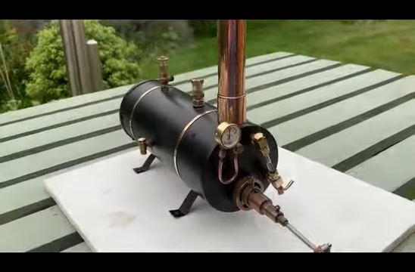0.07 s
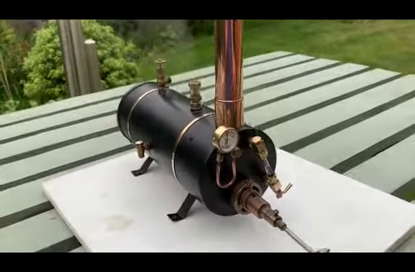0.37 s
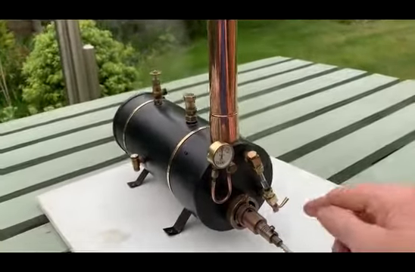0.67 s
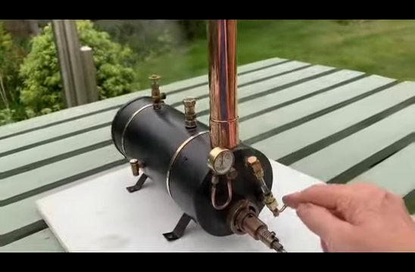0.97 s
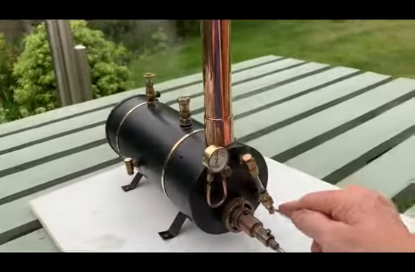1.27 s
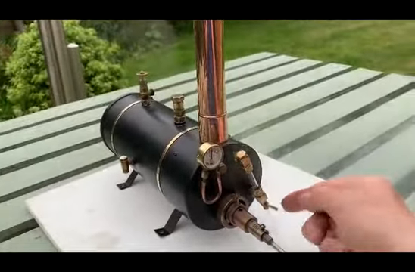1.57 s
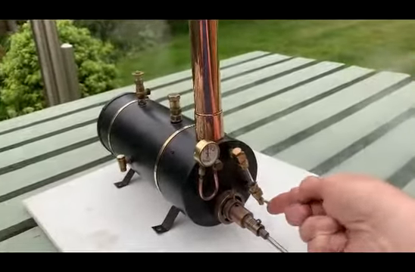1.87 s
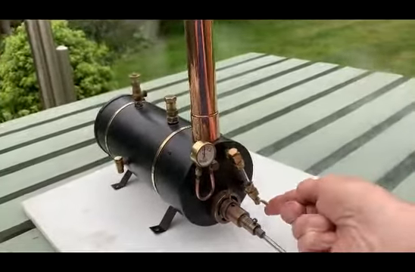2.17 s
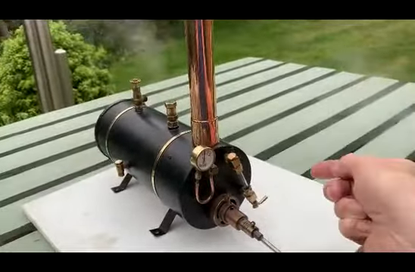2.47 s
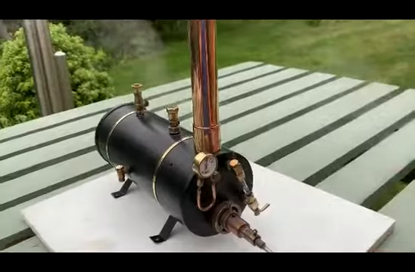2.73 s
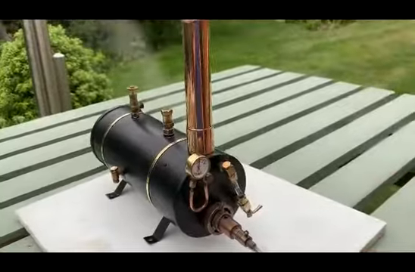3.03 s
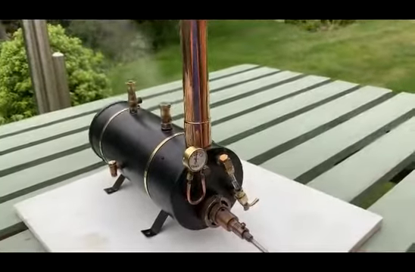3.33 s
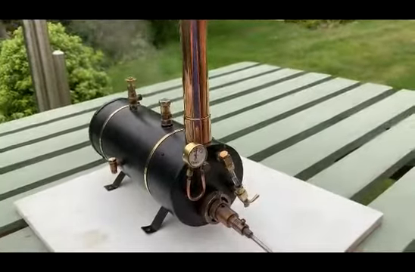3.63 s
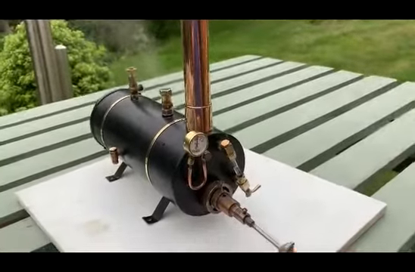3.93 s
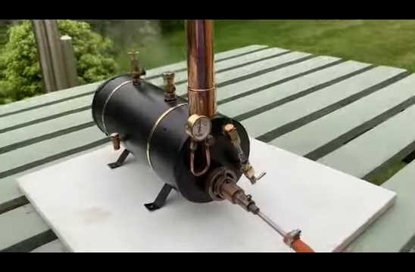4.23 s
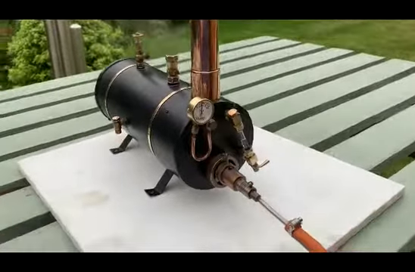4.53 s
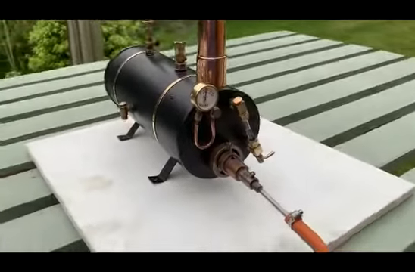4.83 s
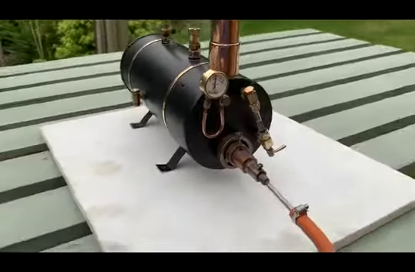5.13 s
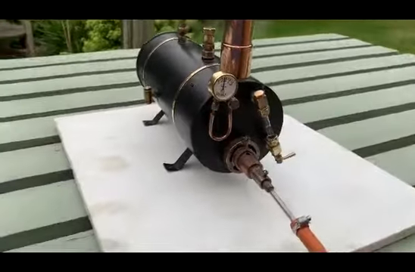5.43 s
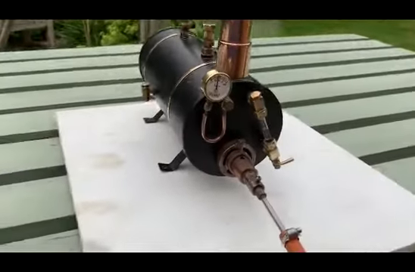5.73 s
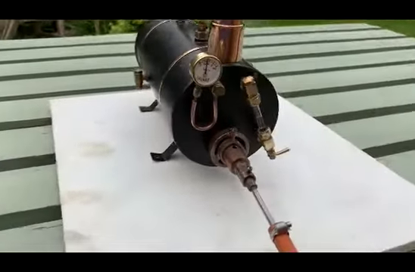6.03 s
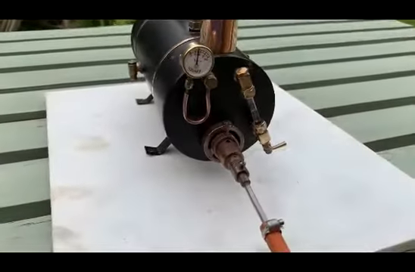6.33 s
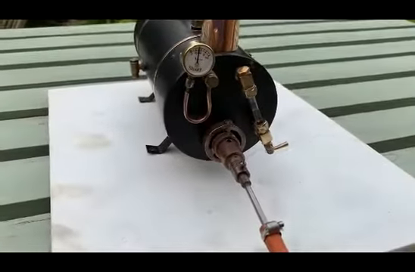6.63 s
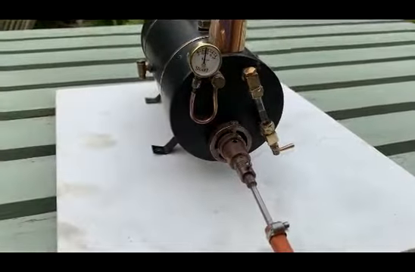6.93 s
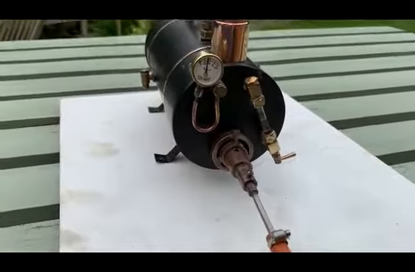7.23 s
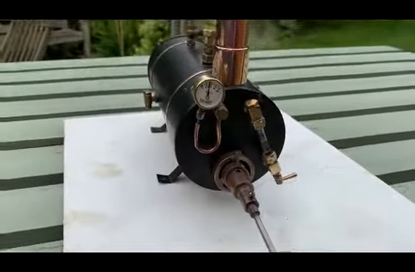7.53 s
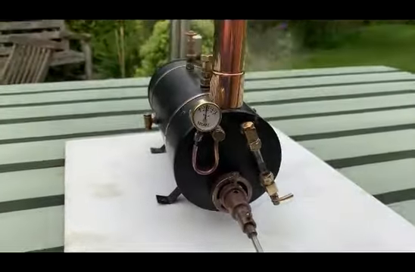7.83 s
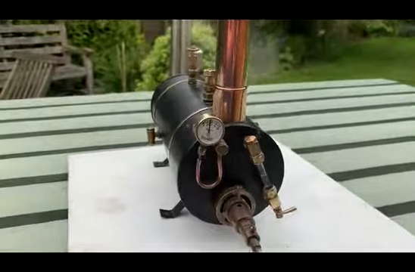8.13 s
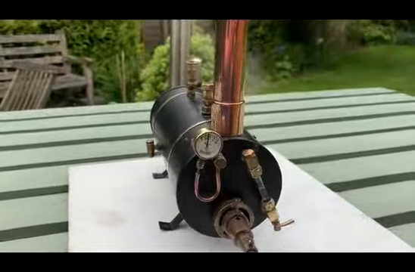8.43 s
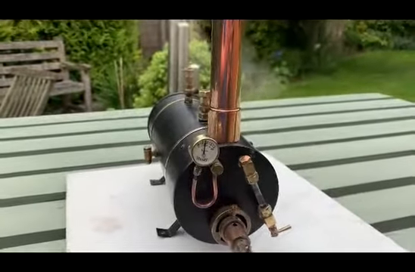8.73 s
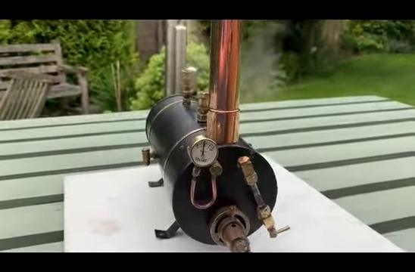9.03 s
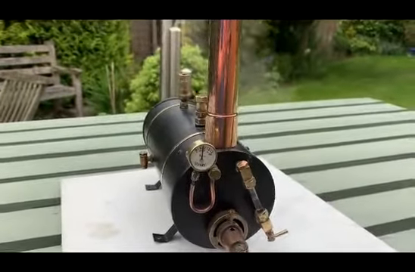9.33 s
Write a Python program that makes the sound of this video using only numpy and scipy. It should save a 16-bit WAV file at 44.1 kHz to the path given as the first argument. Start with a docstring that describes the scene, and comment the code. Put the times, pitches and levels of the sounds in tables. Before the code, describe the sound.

Steam spurts loudly from a little boiler's drain valve, then its gas burner carries on hissing, rumbling and softly popping.

```python
"""A small gas-fired boiler on a garden table, heard from a hand-held microphone moving closer.
The flame rumbles, pops and rings the fire tube; the flue's lowest note pulses its roar.
The gas jet hisses throughout. A drain cock opens for a second: it spits water and blows steam,
and the gain control ducks everything."""
import sys
import numpy as np
from scipy import signal
from scipy.fft import rfft, irfft
from scipy.io import wavfile
from scipy.ndimage import uniform_filter1d, minimum_filter1d, map_coordinates

SR = 44100
rng = np.random.default_rng(int(sys.argv[2]) if len(sys.argv) > 2 else 0)


def file_out(sig):
    """Save sig as 16-bit WAV at sys.argv[1]."""
    # one column per channel
    cols = np.atleast_2d(sig).T
    # limit, then scale
    lim = np.clip(cols, -1, 1)
    pcm = np.round(lim * 32767).astype(np.int16)
    wavfile.write(sys.argv[1], SR, pcm)


N = 418950
TIME_S, FREQ_HZ = np.arange(N) / SR, np.fft.rfftfreq(N, 1 / SR)
FIRE_TUBE_HZ, RING_SIDE_DB, RING_FACING_DB = 1088, -50, 8

# loud flame pops: start_s, relative_peak_db
LOUD_POPS = [(0.405, -28), (0.548, -25.5), (4.234, -26), (4.742, -23), (5.485, -21), (5.555, -23),
             (5.656, -21), (6.086, -24), (6.188, -18.5), (6.556, -21), (6.786, -23), (6.804, -17),
             (6.844, -25), (6.922, -27), (7.174, -18), (7.217, -18.5), (7.235, -20.5), (7.398, -31),
             (7.884, -26), (8.492, -20.5), (8.68, -17), (8.827, -22.5), (8.897, -23.5), (8.95, -22),
             (9.005, -16), (9.058, -21.5), (9.433, -24)]
# flame roar: freq_hz, level_db
ROAR_SPECTRUM = [(330, -28), (450, -27), (540, -7.5), (700, -5.5), (900, -4), (1050, -0.5), (1190, -8.5),
                 (1260, -24.5), (1450, -25.5), (2200, -26), (3500, -85)]
# phase between left and right channels, sound from the drain: freq_hz, left_lead_rad
DRAIN_PHASE = [(100, 0), (2300, .4), (3200, 1.7), (5000, 1.2), (6100, 0), (7000, -1), (8600, -3.14),
               (10500, -6.28), (11100, -6.28), (13450, -9.42), (15300, -12.56)]


def gain_of(db):
    """Decibels to amplitude."""
    return 10 ** (np.asarray(db) / 20)


def unit_rms(x):
    """Scales to rms 1."""
    return x / np.sqrt(np.mean(x ** 2) + 1e-20)


def over_freq(rows):
    """Table interpolated on a log frequency axis."""
    hz, value = np.transpose(rows)
    return np.interp(np.log(FREQ_HZ + 1), np.log(hz + 1), value)


def over_time(rows):
    """Table columns interpolated at every sample."""
    time_s, *columns = np.transpose(rows)
    return [np.interp(TIME_S, time_s, column) for column in columns]


def ramp(start_s, length_s):
    """Linear rise from 0 to 1."""
    return np.clip((TIME_S - start_s) / length_s, 0, 1)


def swell(centre_s, sigma_s):
    """Gaussian envelope, peak 1."""
    return np.exp(-.5 * ((TIME_S - centre_s) / sigma_s) ** 2)


def puff(age_s, decay_s=.004):
    """Pop envelope: quick rise, exponential decay."""
    age = np.maximum(age_s, 0) / decay_s
    return np.sqrt(age) * np.exp(-age)


def resonance(hz, width_hz):
    """One-pole response, gain 1 at centre."""
    return 1 / (1 + 2j * (FREQ_HZ - hz) / width_hz)


def shaped(x, response):
    """Filters by a frequency response; rms 1."""
    return unit_rms(irfft(rfft(x) * response, N))


def wander(rate_hz):
    """Random drift up to about rate_hz; rms 1."""
    return shaped(rng.standard_normal(N), FREQ_HZ / (FREQ_HZ + 2) / (1 + (FREQ_HZ / rate_hz) ** 4))


def turbulence(phase=None):
    """Stereo white noise, by default from the burner's direction."""
    # phase between left and right channels: freq_hz, left_lead_rad
    burner_phase = [(100, 0), (850, .15), (1100, .42), (1800, .5), (2200, .9), (2700, 2.6), (3300, 2.7),
                    (4400, 3.7), (5600, 3.6), (6300, 4.7), (7300, 4.3), (8600, 3.14), (10500, 0),
                    (11100, 0), (13450, -3.14), (15300, -6.28)]
    # stereo width of the noise: freq_hz, left_right_coherence
    stereo_coherence = [(25, .94), (120, .996), (1150, .985), (2000, .65), (3200, .8), (3800, .55),
                        (4300, .75), (4800, .55), (5500, .78), (6100, .35), (6700, .68), (7600, .7),
                        (8350, .998), (8850, .998), (9400, .62), (10000, .6), (10550, .98), (11100, .98),
                        (12400, .8), (13200, .99), (13700, .99), (14550, .42), (15400, .97)]
    # stereo balance: freq_hz, left_minus_right_db
    stereo_balance = [(100, -.7), (1200, -.8), (3400, -.3), (4400, -5), (4900, -8.5), (5400, -4), (7000, 0),
                      (16000, 0)]
    common, separate = rfft(rng.standard_normal((2, N)))
    coherence = np.clip(over_freq(stereo_coherence), 0, 1)
    lead_rad = over_freq(burner_phase if phase is None else phase)
    lean = gain_of(over_freq(stereo_balance) / 2) * np.exp(.5j * lead_rad)
    right = coherence * common + np.sqrt(1 - coherence ** 2) * separate
    return irfft(np.array([common * lean, right / lean]), N)


def burner_gain(side_db, facing_db):
    """Gain of a burner part as the microphone circles; facing the jet adds facing_db."""
    # microphone path: time_s, nearness_db, facing_fraction
    mic_path = [(0, 0, 0.2), (.45, -1.5, 0.25), (1, 1.5, 0.03), (3, 1.3, 0), (4.3, 1.1, 0.4),
                (5.1, 0.5, 0.46), (5.9, 0, 1), (7, 2.1, 0.96), (9.5, 4.5, 0.54)]
    near_db, facing = over_time(mic_path)
    return gain_of(side_db + near_db + facing_db * facing)


def flame(hum_hz=141, drift_hz=5, pulse_depth=.75, flutter_db=.9, ring_flutter_db=1.8):
    """Combustion: rumble and heat-driven standing wave in the flue, roar, fire tube ring."""
    # flame rumble: freq_hz, level_db
    rumble_spectrum = [(20, -38), (42, -34), (65, -16), (105, -10.5), (135, -3), (175, 0), (250, -4.5),
                       (340, -7), (400, -25.5), (470, -24.5), (900, -52)]
    # flue resonances: centre_hz, width_hz, lift_db
    flue_modes = [(159, 18, 5), (320.7, 43, 8.5)]
    flue = 1 + sum((gain_of(db) - 1) * resonance(hz, width_hz) for hz, width_hz, db in flue_modes)
    surge = gain_of(wander(38))
    rumble = shaped(turbulence() * surge, gain_of(over_freq(rumble_spectrum)) * flue)
    draught = np.sin(2 * np.pi * np.cumsum(hum_hz + drift_hz * wander(26)) / SR)
    throb_db = shaped(rng.standard_normal(N), resonance(36, 21) ** 2)
    hum = unit_rms(draught * surge * gain_of(throb_db))
    # the standing wave pumps the flame once a cycle
    burn = np.maximum(1 + pulse_depth * draught, 0) * gain_of(flutter_db * wander(32)) * falter()
    roar_response = gain_of(over_freq(ROAR_SPECTRUM))
    roar = shaped(turbulence() * burn, roar_response)
    ring_drive = turbulence() * burn * gain_of(ring_flutter_db * wander(26))
    ring = shaped(ring_drive, roar_response * resonance(FIRE_TUBE_HZ, width_hz=72) ** 2)
    return (burner_gain(side_db=-43, facing_db=1.07) * rumble
            + burner_gain(side_db=-48.5, facing_db=4) * hum
            + burner_gain(side_db=-47, facing_db=5) * roar
            + burner_gain(RING_SIDE_DB, RING_FACING_DB) * ring)


def gas_jet(side_db=-46, front_db=-47, flicker_db=.74):
    """Nozzle hiss, combed by its inverted echo off the table as the microphone moves."""
    # hiss from the side and from in front: freq_hz, level_db
    side_spectrum = [(500, -13), (1400, -7), (2300, -9), (2550, -27), (2850, -16), (3050, -4), (3500, 1),
                     (3800, 3.5), (4250, 5), (4600, -1), (5000, 0.5), (5750, 0), (6200, -6), (6700, -2),
                     (7300, -1.5), (8100, -7), (9400, -1.5), (10400, -4), (11000, 1.5), (11800, 7.5),
                     (12400, 3), (13300, 2), (14400, -11), (15200, -0.5), (15900, -9), (17000, -27)]
    front_spectrum = [(500, -2), (1400, -6.5), (2500, -2), (3200, -14), (3500, 1), (3850, 4.5), (4600, 8),
                      (5400, 1), (6200, -2), (7000, 1), (7450, 3), (8500, -12), (9800, -4), (10450, -8),
                      (11400, 3.5), (11800, 8.5), (12200, 1), (12900, -4), (13500, -1), (14200, -20),
                      (15000, -17), (15450, -6), (17000, -21)]
    # path round the nozzle: time_s, level_db, front_fraction, echo_gain
    jet_path = [(.1, .2, 0, 0.4), (1, -0.5, 0, 0.23), (3.05, 0.8, 0.07, 0.07), (3.8, 0.5, 0.2, .37),
                (5.1, 0.8, 0.3, 0.37), (5.55, 0, 0.7, 0.4), (5.8, -0.7, .75, .15), (6.15, 0.8, 1, 0.06),
                (7, 2.1, 1, 0), (8, 2.5, 0.87, 0.16), (9.5, 3, 0.88, 0.07)]
    # table-top echo: time_s, delay_ms
    echo_delay = [(.1, .511), (.4, .518), (.9, .549), (1.1, .553), (3.05, .543), (3.8, .523), (4.3, .506),
                  (4.8, .478), (5.3, .462), (5.8, .475)]
    level_db, front, echo_gain = over_time(jet_path)
    delay_ms, = over_time(echo_delay)
    noise = turbulence()
    side_hiss = gain_of(side_db) * shaped(noise, gain_of(over_freq(side_spectrum)))
    front_hiss = gain_of(front_db) * shaped(noise, gain_of(over_freq(front_spectrum)))
    hiss = (1 - front) * side_hiss + front * front_hiss
    delayed_index = np.arange(N) - delay_ms * SR / 1000
    echo = np.array([map_coordinates(channel, [delayed_index], order=3) for channel in hiss])
    return (hiss - echo_gain * echo) * gain_of(level_db + flicker_db * wander(21))


def tube_overtones(flutter_db=2):
    """The flame rings the fire tube's overtones, with higher hissing resonances above."""
    # overtones and hissing resonances: centre_hz, width_hz, level_db
    modes = [(1340, 80, -69), (2175, 170, -63.4), (2990, 190, -65.3), (4560, 280, -61.5),
             (5200, 320, -63.5)]
    # mode gains along the microphone path: time_s, lowest_two_db, others_db
    mode_gains = [(.2, 0.5, -11), (1, 3.5, 3), (3, -5.5, -2), (4.3, 0, -7), (5.1, -1.5, 3), (5.75, 4, 8),
                  (7, -1.5, 10.5), (8, 6, 9.5), (9.5, 4.5, 9)]
    noise = turbulence() * gain_of(flutter_db * wander(27))
    low_db, high_db = over_time(mode_gains)
    rings = [gain_of(db) * shaped(noise, resonance(hz, width_hz) ** 2) for hz, width_hz, db in modes]
    return gain_of(low_db) * sum(rings[:2]) + gain_of(high_db) * sum(rings[2:])


def fire_tube_puffs(envelope, width_hz):
    """Bursts of roar through the fire tube resonance; rms 1."""
    response = gain_of(over_freq(ROAR_SPECTRUM)) * resonance(FIRE_TUBE_HZ, width_hz)
    return shaped(turbulence() * envelope, response)


def sputter(rate_per_s=18, relative_to_ring_db=-8):
    """Small flame pops at random times."""
    triggers = 1. * (rng.random(N) < rate_per_s / SR)
    envelope = signal.oaconvolve(triggers, puff(TIME_S[:SR // 10]))[:N]
    puffs = fire_tube_puffs(envelope, width_hz=210)
    return burner_gain(RING_SIDE_DB, RING_FACING_DB) * gain_of(relative_to_ring_db) * puffs


def falter(lead_s=.0089, dip_db=-2.5):
    """Flame gain, dipping as unburnt gas gathers before each loud pop."""
    dips = sum(np.exp(-((TIME_S - start_s) / lead_s + 1) ** 2) for start_s, _ in LOUD_POPS)
    return gain_of(dip_db * dips)


def pops(trim_db=-5):
    """Gas pockets catch at once: soft puffs that ring the fire tube."""
    start_s, peak_db = np.transpose(LOUD_POPS)
    latest = np.maximum(np.searchsorted(start_s, TIME_S) - 1, 0)
    puffs = fire_tube_puffs(puff(TIME_S - start_s[latest]), width_hz=190)
    peaks = np.maximum.reduceat(abs(puffs).max(0), (start_s * SR).astype(int))
    return puffs * (gain_of(peak_db + trim_db) / peaks)[latest]


def steam(crack_s=1.193, open_s=1.328, shut_s=2.262, leak_db=-37.5, blow_db=-28.5):
    """Wet steam leaks, then rushes from the drain cock, surging as water slugs clear."""
    # steam rush: freq_hz, level_db
    steam_spectrum = [(90, -49), (300, 7.5), (440, -17), (600, 4.5), (850, 4.5), (1450, 2), (1950, -9),
                      (2400, -7.5), (3500, -2.5), (4000, -7.5), (5300, -3.5), (6100, -2), (7200, 12),
                      (8300, 5), (9300, 3), (10800, 2), (11700, 10.5), (12300, 4.5), (13200, 2),
                      (14200, -6), (15400, 8), (17000, -5)]
    # water slugs, and a last surge as the cock shuts: centre_s, surge_db, sigma_s
    spits = [(1.333, 4.5, 0.0053), (1.348, 1, 0.0091), (1.366, 4, .005), (1.384, 5, 0.0045),
             (1.412, -1, .004), (1.455, 0, 0.0035), (1.467, 2, 0.0032), (2.256, 2, 0.0028)]
    leak = gain_of(leak_db) * ramp(crack_s, .085)
    blow = (gain_of(blow_db) - gain_of(leak_db)) * ramp(open_s, .0057)
    flow = (leak + blow) * (1 - ramp(shut_s, .009))
    surge_db = sum(db * swell(centre_s, sigma_s) for centre_s, db, sigma_s in spits)
    rush = shaped(turbulence(DRAIN_PHASE), gain_of(over_freq(steam_spectrum)))
    flicker_db = .2 * wander(88) + .5 * wander(17)
    return rush * flow * gain_of(surge_db + flicker_db)


def gulps():
    """Water slugs leave the drain pipe, each a short falling note."""
    # gulp notes: centre_s, peak_db, sigma_s, pitch_hz, glide_hz_per_s
    notes = [(1.3215, -30, 0.0033, 150, -4000), (1.33, -37, 0.0065, 310, -3000),
             (1.342, -32, 0.0072, 807, -24000), (1.362, -27, 0.0039, 660, -5000),
             (1.399, -37, 0.0043, 660, -9000), (1.422, -41, 0.0053, 606, -4000),
             (1.44, -38, 0.0036, 620, -2000), (1.485, -36, .007, 610, -1000)]
    out = 0
    for centre_s, peak_db, sigma_s, pitch_hz, glide_hz_per_s in notes:
        age_s = TIME_S - centre_s
        cycles = pitch_hz * age_s + .5 * glide_hz_per_s * age_s ** 2 + rng.random()
        out = out + gain_of(peak_db) * swell(centre_s, sigma_s) * np.sin(2 * np.pi * cycles)
    return out


def gurgles():
    """The drain pipe clears with a falling gush, then rings hollow and sizzles."""
    # pipe resonances: centre_s, level_db, sigma_s, centre_hz, width_hz, glide_hz_per_s
    pipe_swells = [(1.358, -46, 0.025, 1410, 300, -9000), (1.638, -42, .19, 610, 55, -2.5),
                   (1.663, -51.5, 0.18, 2350, 400, -1), (1.686, -35, 0.14, 9400, 1500, 2),
                   (2.028, -46.5, .19, 1520, 455, 2)]
    noise, out = turbulence(DRAIN_PHASE), 0
    for centre_s, level_db, sigma_s, centre_hz, width_hz, glide_hz_per_s in pipe_swells:
        ring = signal.hilbert(shaped(noise, resonance(centre_hz, width_hz) ** 2))
        glide = np.exp(1j * np.pi * glide_hz_per_s * (TIME_S - centre_s) ** 2)
        out = out + (ring * glide).real * gain_of(level_db) * swell(centre_s, sigma_s)
    return out


def scene():
    """Burner and drain cock in open air."""
    burner = flame() + pops() + sputter() + gas_jet() + tube_overtones()
    return burner + steam() + gurgles() + gulps()


def gain_control(x, threshold_db=-38, knee_db=3, depth_db=9, attack_s=.023, hold_s=.628,
                 release_s=.0055, creep_db_per_s=5, recover_db_per_s=.0352):
    """Loud treble ducks the gain by a held step, plus a creep that recovers slowly."""
    treble = signal.sosfilt(signal.butter(2, 5000, "high", fs=SR, output="sos"), x)
    power_db = 10 * np.log10(abs(uniform_filter1d((treble ** 2).mean(0), size=400)) + 1e-12)
    over = np.clip((power_db - threshold_db) / knee_db, 0, 1)
    hold_samples = int(hold_s * SR)
    held = -minimum_filter1d(-over, hold_samples, origin=(hold_samples - 1) // 2, mode="constant")
    poles = np.exp(-1 / (np.array([attack_s, release_s]) * SR))
    step = np.min([signal.lfilter([1 - pole], [1, -pole], held) for pole in poles], axis=0)
    drift_db = np.cumsum(over * creep_db_per_s - (1 - over) * recover_db_per_s) / SR
    creep_db = drift_db - np.minimum.accumulate(drift_db)
    return x * gain_of(-depth_db * step - creep_db)


def record(dry):
    """Gain control, then low-pass."""
    lowpass = signal.firwin(511, cutoff=15850, window=("kaiser", 9), fs=SR)
    return signal.oaconvolve(gain_control(dry), lowpass[None], "same")


dry = scene()
out = record(dry)
file_out(out)
```